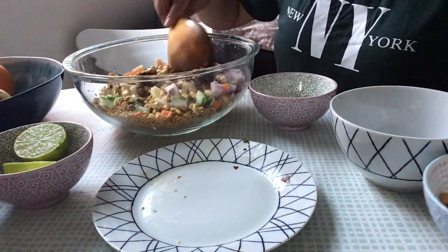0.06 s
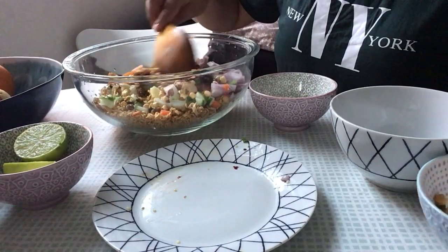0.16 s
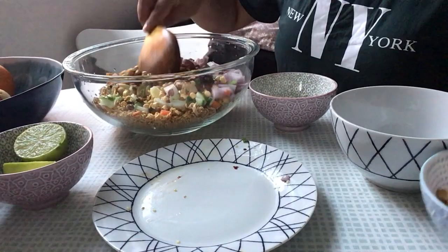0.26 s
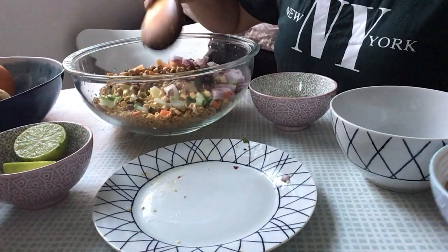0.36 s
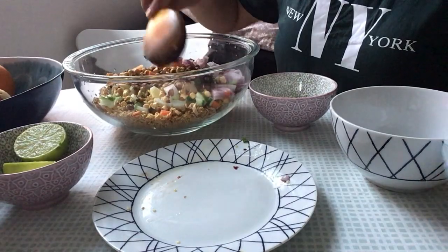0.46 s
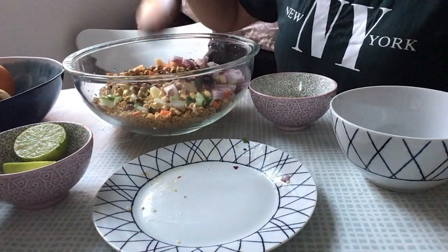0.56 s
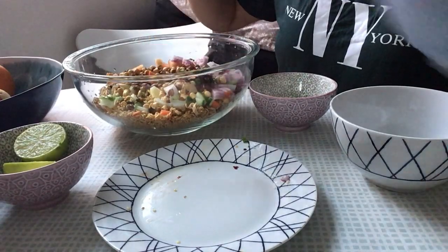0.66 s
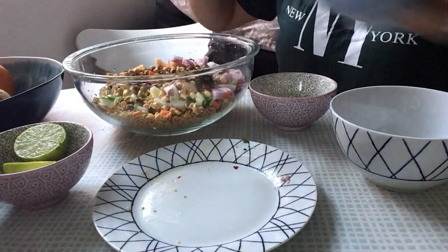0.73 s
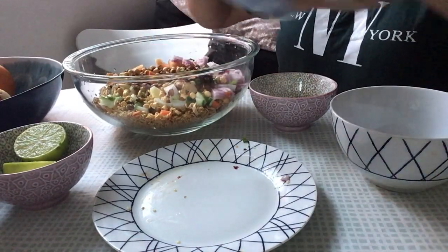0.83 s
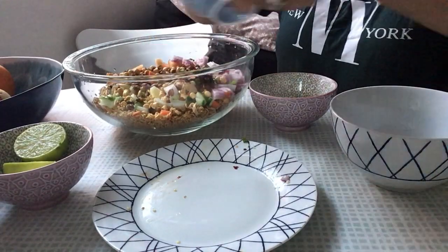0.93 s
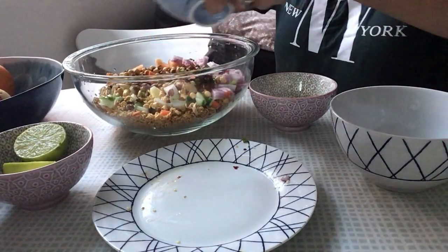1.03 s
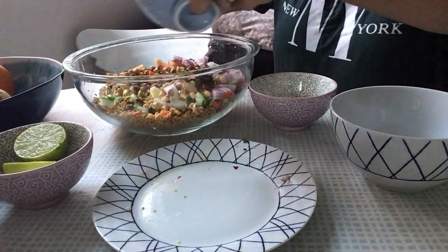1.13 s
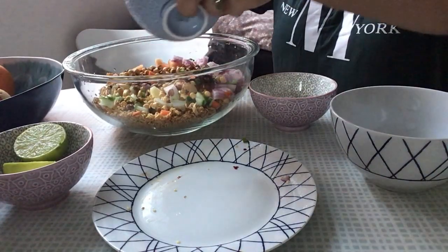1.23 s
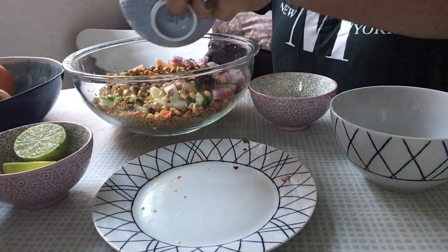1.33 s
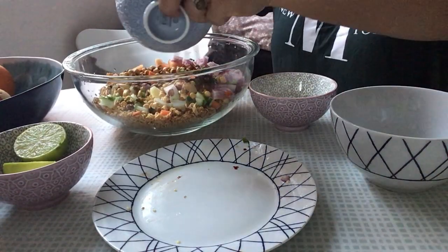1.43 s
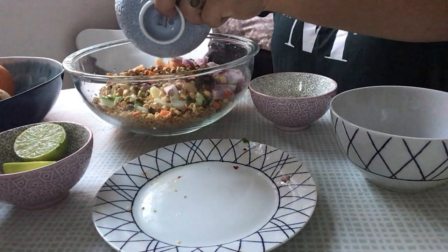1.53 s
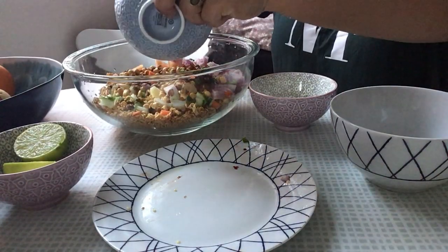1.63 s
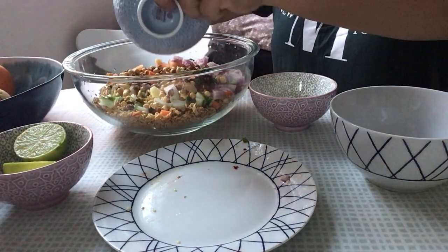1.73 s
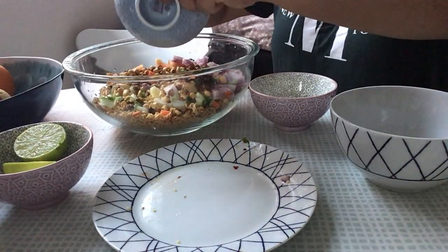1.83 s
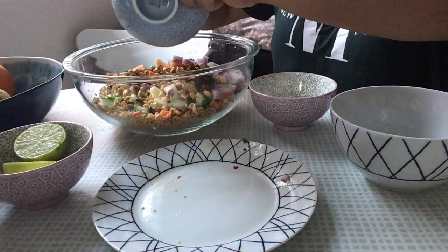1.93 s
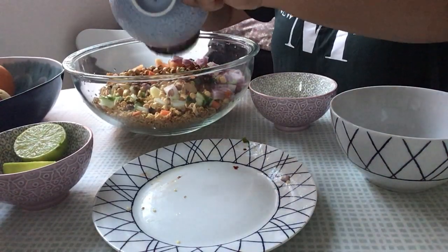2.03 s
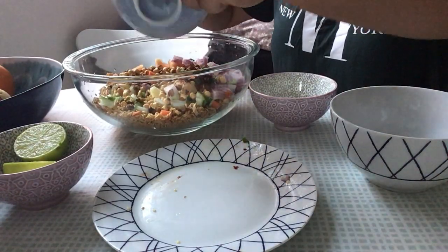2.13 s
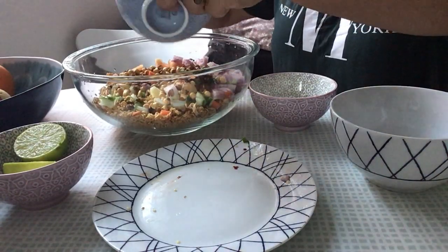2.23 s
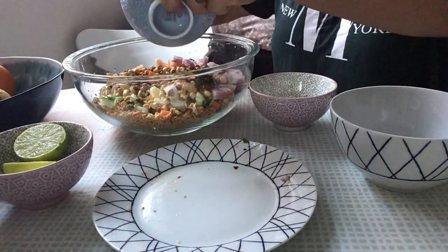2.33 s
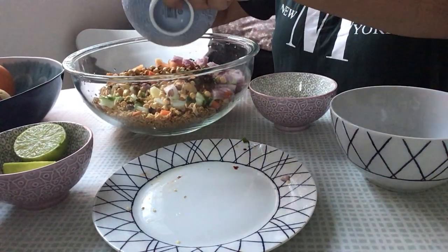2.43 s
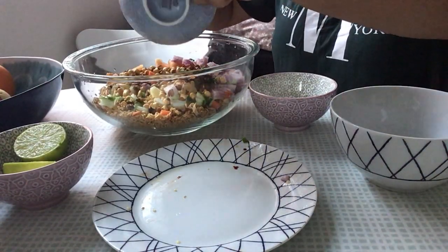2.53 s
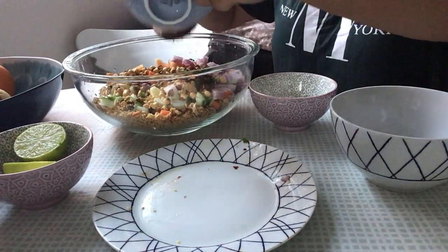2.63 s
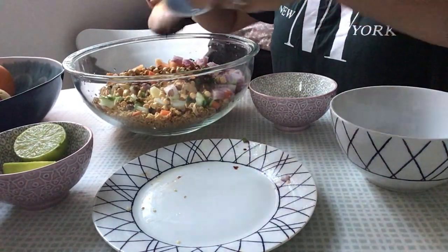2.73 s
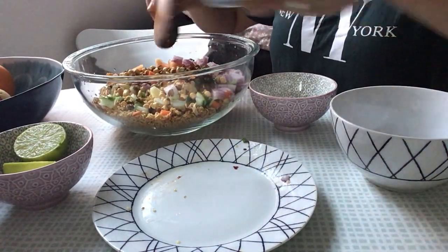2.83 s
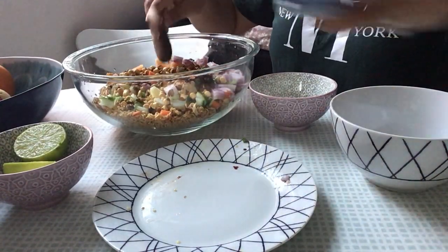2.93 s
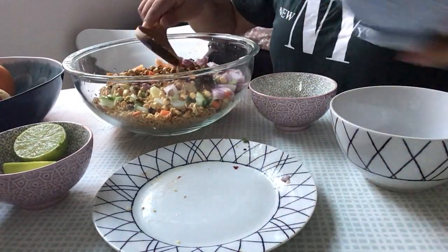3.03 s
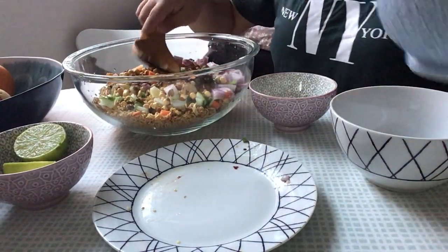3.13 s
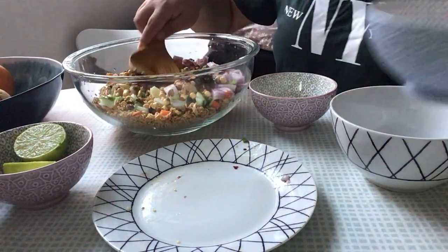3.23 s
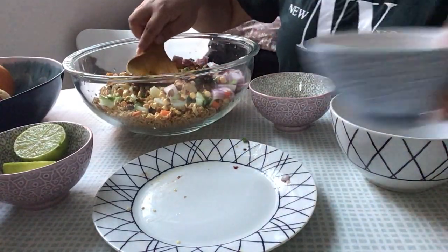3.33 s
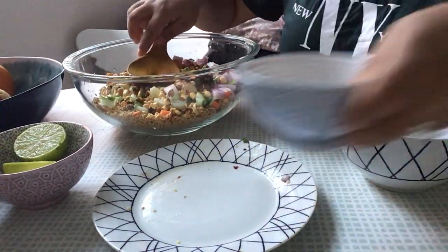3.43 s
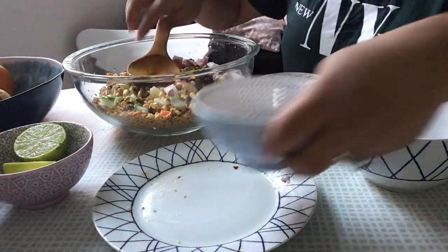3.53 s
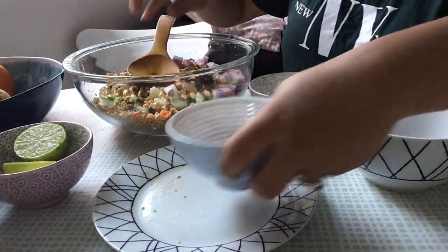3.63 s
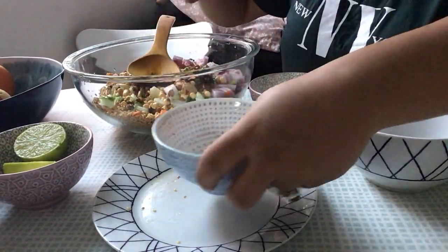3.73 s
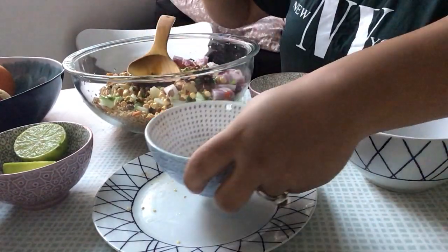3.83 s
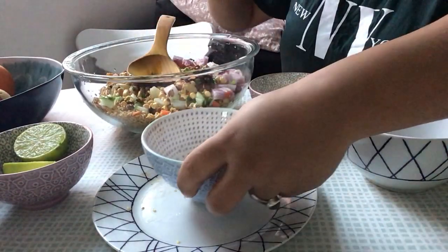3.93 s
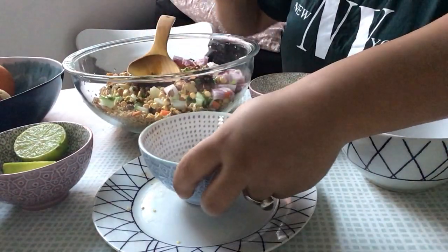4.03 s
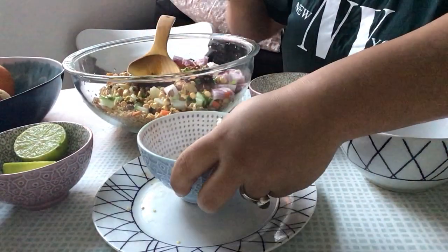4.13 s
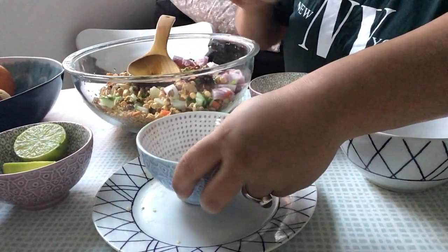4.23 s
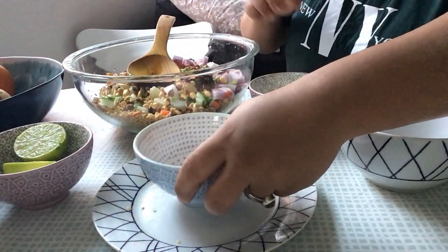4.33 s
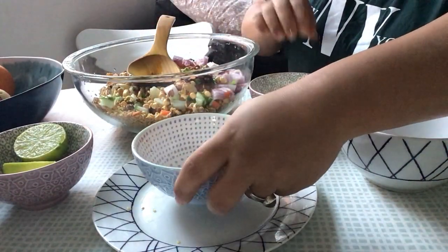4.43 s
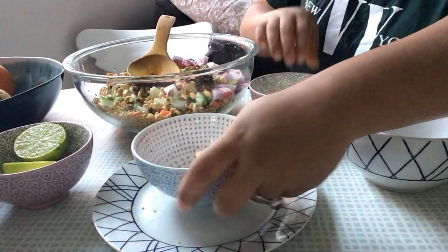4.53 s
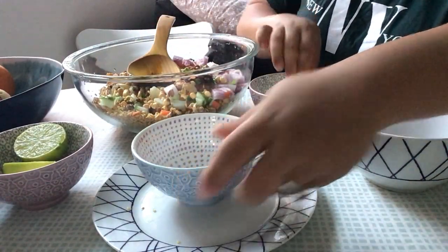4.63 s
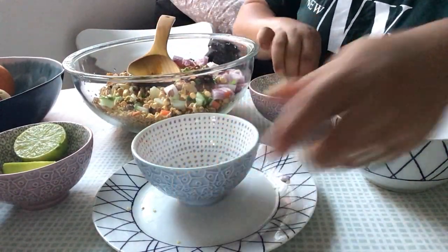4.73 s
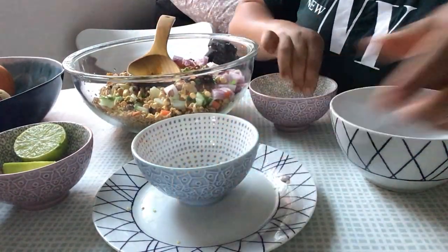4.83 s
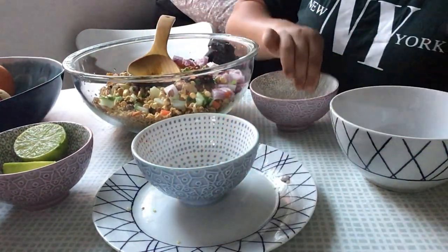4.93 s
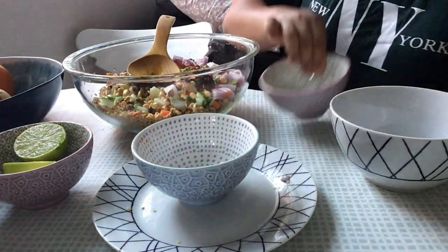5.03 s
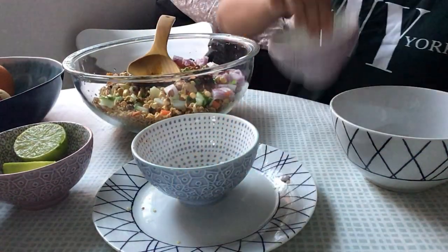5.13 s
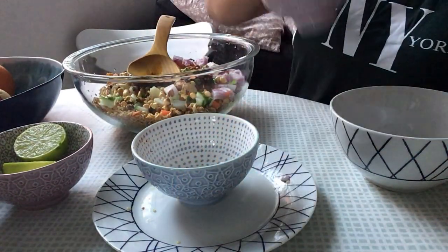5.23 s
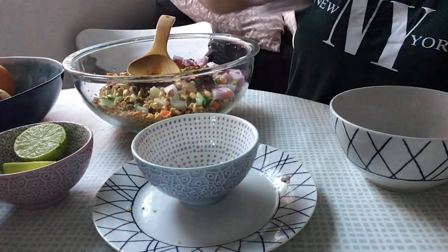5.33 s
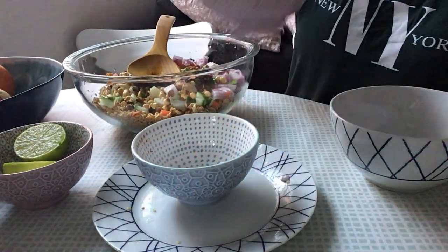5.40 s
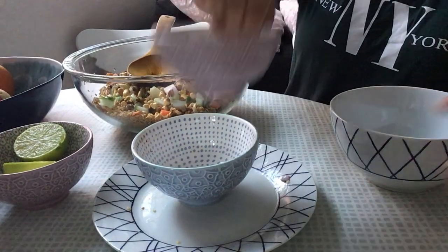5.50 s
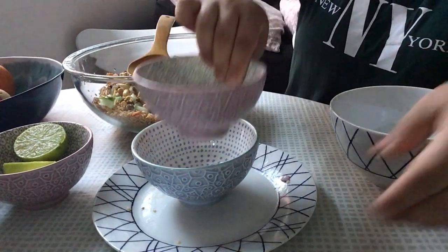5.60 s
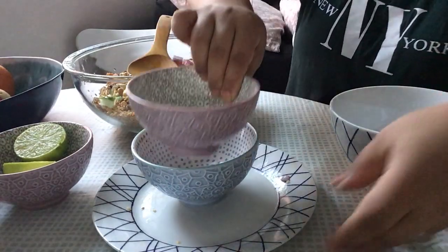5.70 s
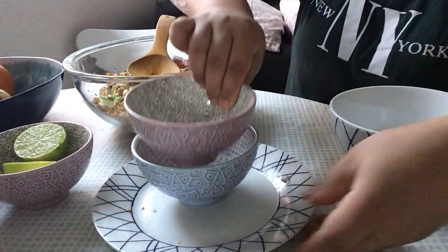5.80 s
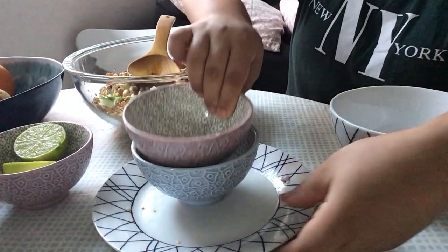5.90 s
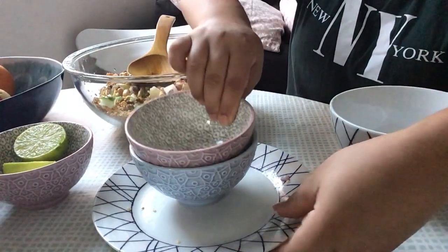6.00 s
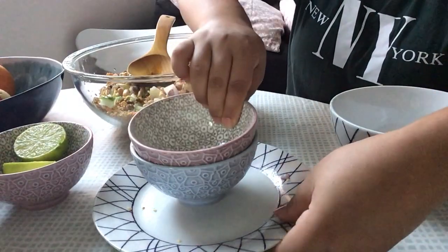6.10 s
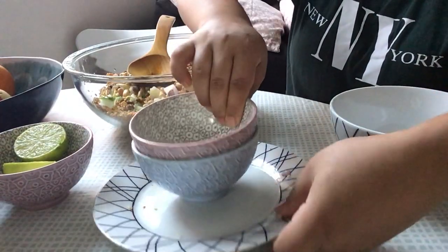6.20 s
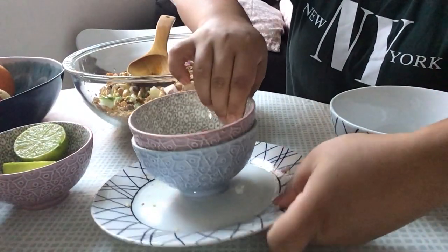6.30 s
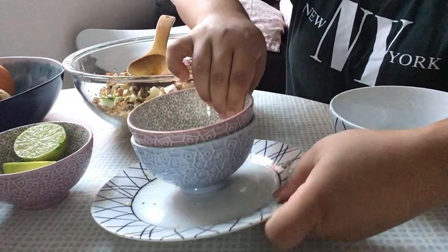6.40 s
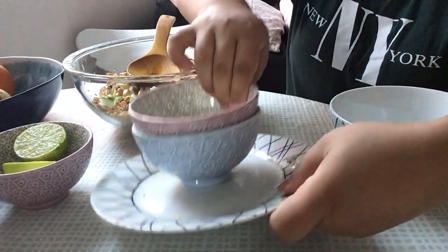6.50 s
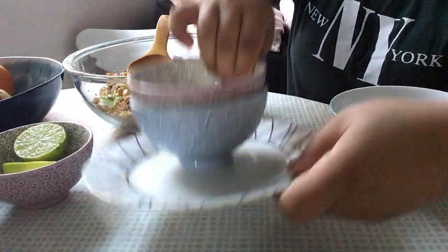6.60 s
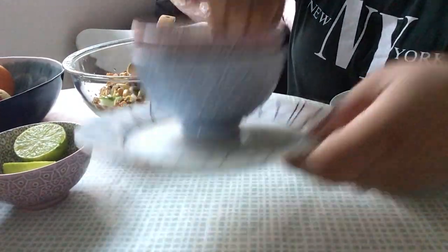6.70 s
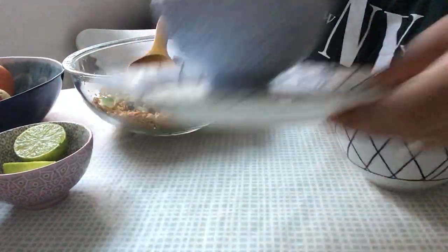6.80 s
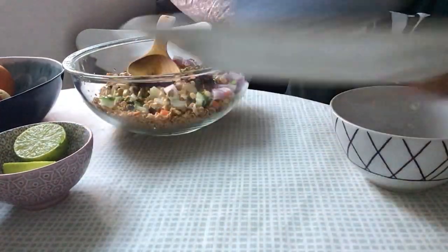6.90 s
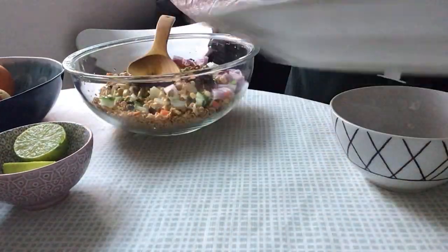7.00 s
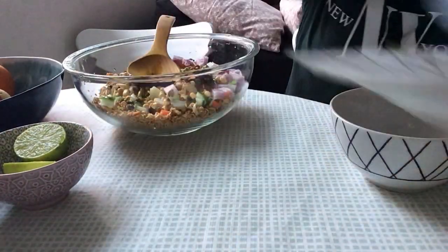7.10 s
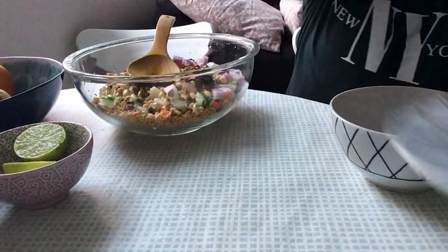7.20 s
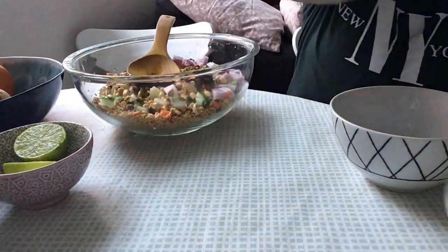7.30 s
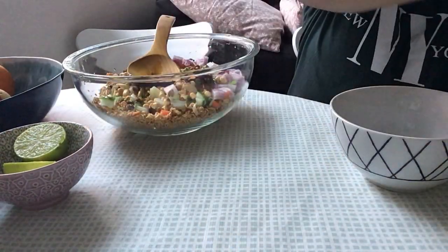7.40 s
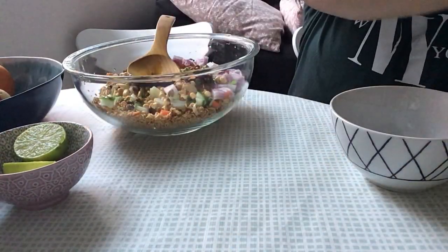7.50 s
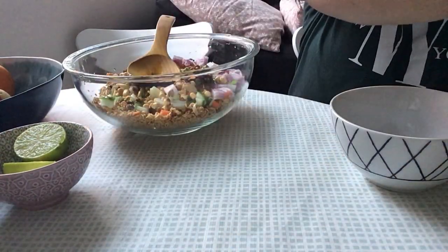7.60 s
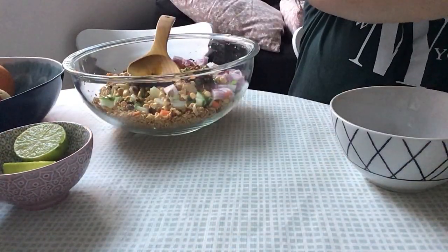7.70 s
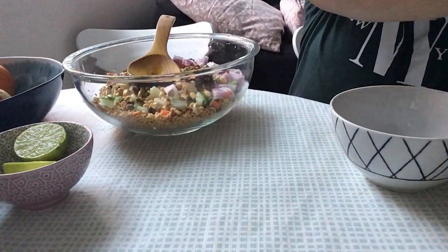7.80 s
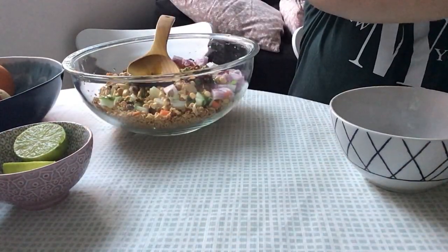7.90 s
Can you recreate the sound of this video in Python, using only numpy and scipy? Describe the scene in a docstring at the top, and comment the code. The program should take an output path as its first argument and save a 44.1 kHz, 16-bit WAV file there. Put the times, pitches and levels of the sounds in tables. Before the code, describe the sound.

Close view of a kitchen table in a small, quietly humming room. A fading glass ring and soft food rustle come first, then a wooden spoon scrapes and ticks inside a small china bowl. The spoon drops into the glass bowl, the china bowl clinks onto a plate, a second bowl clatters into it, and the stack faintly chatters away before a clack, thud and sharp clicks.

```python
"""Tidying a kitchen table in a small, humming room: beating sines ring a glass bowl while filtered grains rustle.
A wooden spoon scrapes a held china bowl empty: grain noise, ticks and small rings stirred by crumbs.
The spoon drops into the glass, then the china bowl is set on a plate: noise cracks and decaying modes.
A second bowl scuffs the table and clatters into the first, the air between them hooting as a shaken sine.
The stack is carried off, chattering in bursts of tiny rings, and put down with a clack."""
import sys
import numpy as np
from scipy import signal
from scipy.fft import rfft, irfft, next_fast_len
from scipy.io import wavfile
from scipy.ndimage import map_coordinates

SR = 44100
rng = np.random.default_rng(int(sys.argv[2]) if len(sys.argv) > 2 else 0)


def persist_wave(psi):
    """Save psi, clipped to +-1, as 16-bit WAV."""
    counts = np.round(np.clip(psi, -1, 1) * 32767).astype(np.int16)
    wavfile.write(sys.argv[1], SR, np.atleast_2d(counts).T)


N = 350595
TIME = np.arange(N) / SR
AGE = TIME[:SR]  # seconds since a blow


def amp(db):
    """Decibels to gain."""
    return 10 ** (np.asarray(db) / 20)


def unit(x):
    """Scale to rms 1."""
    return x / np.sqrt(np.mean(x ** 2) + 1e-20)


def along(points, hz):
    """Read (Hz, value) points on a log frequency axis."""
    f, v = np.transpose(points)
    return np.interp(np.log(hz + 1), np.log(f + 1), v)


def coloured(x, points, tilt_db=0):
    """Filter x to a spectrum, tilted per octave above 700 Hz, at rms 1."""
    m = next_fast_len(len(x))
    hz = np.fft.rfftfreq(m, 1 / SR)
    octaves = np.log2(np.maximum(hz / 700, 1))
    gain = amp(along(points, hz) + tilt_db * octaves)
    return unit(irfft(rfft(x, m) * gain, m)[:len(x)])


def fade(t60, attack):
    """A quick rise and an exponential fall, both in seconds."""
    return np.exp(-np.log(1000) * AGE / t60) * (1 - np.exp(-AGE / attack))


def add(track, s, sound):
    """Mix a sound in at s seconds."""
    part = track[max(round(s * SR), 0):][:len(sound)]
    part += sound[:len(part)]


def crack(colour, t60, tilt_db=0):
    """Fading noise for the crowd of short-lived modes that a contact excites."""
    return coloured(rng.standard_normal(SR), colour, tilt_db) * fade(t60, 0.00095)


def ring(modes, scatter_db=3.0, detune=0.0022):
    """An object's modes; grip and point of contact change their strength and pitch at each blow."""
    hz, db, t60 = np.transpose(modes)[:, :, None]
    hz = hz * (1 + detune * rng.standard_normal(hz.shape))
    phase = 2 * np.pi * rng.random(hz.shape)
    size = amp(db + scatter_db * rng.standard_normal(hz.shape))
    partials = size * fade(t60, attack=0.00082) * np.sin(2 * np.pi * hz * AGE + phase)
    return np.sum(partials, axis=0)


def tilted(modes, tilt_db, pivot_hz):
    """Modes as a softer or harder contact excites them: tilted per octave about a pivot."""
    return [(hz, db + tilt_db * np.log2(hz / pivot_hz), t60) for hz, db, t60 in modes]


def softened(rows, cutoff_hz):
    """(Hz, dB, ..) rows as a soft contact excites them: little above its cut-off."""
    return [(hz, db - 20 * np.log10(1 + (hz / cutoff_hz) ** 4), *rest) for hz, db, *rest in rows]


def thud(hz, t60, attack):
    """One heavily damped resonance; a surface radiates by its acceleration, so little deep bass escapes."""
    velocity = np.sin(2 * np.pi * hz * AGE) * fade(t60, attack)
    return np.gradient(velocity) * SR / (2 * np.pi * hz)


def grains(rate, spread_db):
    """Tiny random slips of uneven size, at a mean rate per second."""
    slips = rng.random(N) < rate / SR
    return slips * rng.standard_normal(N) * amp(spread_db * rng.standard_normal(N))


def strokes(rows, attack_s, sag_db_per_s, release_s):
    """Gain of rubbing strokes: each sets in, eases off while it lasts and dies away."""
    gain = np.zeros(N)
    for s, length, db in rows:
        age = np.maximum(TIME - s, 0)
        release = np.exp(-np.maximum(age - length, 0) / release_s)
        gain += amp(db - sag_db_per_s * age) * np.minimum(age / attack_s, 1) * release
    return gain


def landing(contacts, colour, modes, t60, bounce_tilt_db):
    """Something lands and bounces; the crack gets duller with each bounce."""
    out = np.zeros(N)
    for bounce, (s, crack_db, ring_db) in enumerate(contacts):
        add(out, s, amp(crack_db) * crack(colour, t60, tilt_db=bounce * bounce_tilt_db))
        add(out, s, amp(ring_db) * ring(modes, scatter_db=1, detune=.001))
    return out


# How long the small room holds each pitch. Each row: frequency in Hz, t60 in seconds.
ROOM = [(100, 1), (500, 0.17), (2000, 0.45), (5000, 0.3), (9000, 0.36), (15000, 0.35)]


def in_room(x, wet_db):
    """Add the walls' answer: a noise tail in which each frequency dies at its own speed."""
    hz, t, z = signal.stft(rng.standard_normal(SR), SR, nperseg=256)
    decay = np.exp(-np.log(1000) * t / along(ROOM, hz)[:, None])
    tail = signal.istft(z * decay, SR)[1][:SR]
    tail *= 1 - np.exp(-(AGE / 0.0022) ** 2)
    return x + amp(wet_db) * signal.fftconvolve(x, tail / np.linalg.norm(tail))[:N]


# Colour of the air noise. Each row: frequency in Hz, relative level in dB.
ROOM_TONE = [(25, -35), (42, -4.5), (59, -4.5), (108, -8), (137, -4.5), (190, -6.5), (217, 1.5),
             (249, -10.5), (293, -3.5), (463, -14), (560, -12), (863, -18), (3920, -27.5), (12500, -39),
             (16000, -43)]
# The appliance's partials. Each row: frequency in Hz, peak level in dB.
HUM = [(130, -90.5), (146, -75), (219, -72.5)]


def room_tone():
    """Steady air noise with an appliance's hum, its phase wavering slightly."""
    out = amp(-66) * coloured(rng.standard_normal(N), ROOM_TONE)
    for hz, db in HUM:
        drift = map_coordinates(rng.standard_normal(64), [TIME * 5], mode="mirror")
        out += amp(db) * np.sin(2 * np.pi * hz * TIME + 1.2 * drift)
    return out


# The glass note sinks into a dip, swells back and fades. Each row: time in seconds, rms level in dB
# of the main sine, before its twin joins.
GLASS_LEVEL = [(0, -48.5), (.28, -50.5), (.47, -59), (.57, -67), (.6, -79), (.63, -66), (.73, -59.5),
               (1.15, -68), (3, -126)]


def glass_note():
    """One mode of the glass bowl is a close pair, so it throbs; the twin fades faster."""
    hz, beat_hz, twin_db, twin_fade_db_per_s = 1206.4, 11.2, -11.5, 4
    main = np.sin(2 * np.pi * hz * TIME)
    twin_phase = 2 * np.pi * (hz * TIME - beat_hz * (TIME - .02))
    twin = amp(twin_db - twin_fade_db_per_s * TIME) * np.sin(twin_phase)
    level_db = np.interp(TIME, *np.transpose(GLASS_LEVEL))
    return np.sqrt(2) * amp(level_db) * (main + twin)


# Salad and cloth rub. Each row: start in seconds, length in seconds, starting level in dB.
RUSTLES = [(-.02, 0.62, -68), (.26, 0.085, -71), (3.12, 0.45, -77.5), (5.05, 0.032, -70),
           (5.795, 0.31, -65.5)]
# Colour of dry contacts, for rustles and clicks. Each row: frequency in Hz, relative level in dB.
DRY = [(60, -35.5), (200, 4), (1000, -12), (2000, -7), (3500, -6), (6500, -8.5), (10000, -10),
       (14000, -6.5), (16000, -14.5)]


def rustles():
    """Salad and cloth rustle faintly: a patter of tiny slips under soft strokes."""
    rubbing = strokes(RUSTLES, attack_s=0.0099, sag_db_per_s=15.0, release_s=0.017)
    return in_room(rubbing * coloured(grains(rate=13000, spread_db=7.5), DRY), wet_db=-4.0)


# The spoon crunches into the salad. Each row: start in seconds, level in dB.
CRUNCHES = [(0.136, -49), (0.251, -50.5), (0.297, -51), (1.232, -41), (1.252, -48), (3.318, -58.5),
            (3.413, -55.5)]
# Colour of a crunch. Each row: frequency in Hz, relative level in dB.
CRUNCH = [(600, -20), (2200, -5), (3200, 3), (4800, -3), (7000, -11), (9000, -26), (15000, -22)]


def crunches():
    """The salad gives way under the spoon in short bursts of noise."""
    out = np.zeros(N)
    for s, db in CRUNCHES:
        add(out, s, amp(db) * crack(CRUNCH, t60=0.033))
    return in_room(out, wet_db=-4.0)


# Modes of the table top. Each row: frequency in Hz, relative level in dB.
TABLE = [(76, -28), (132, -6.5), (205, -3), (312, 3), (403, 3.5)]


def table_thud(cutoff_hz):
    """The table top's damped modes, low-passed by the softness of the contact; the strongest is at 0 dB."""
    hz, db = np.transpose(softened(TABLE, cutoff_hz))
    gains = amp(db - db.max())
    return sum(g * thud(f, t60=14 / f, attack=0.004) for f, g in zip(hz, gains))


# Soft bumps on the table. Each row: start in seconds, level in dB, contact cut-off in Hz.
BUMPS = [(.322, -49, 116), (0.445, -44, 300), (0.502, -45, 165), (4.489, -50.5, 45), (4.538, -52, 55),
         (6.33, -54, 130), (7.658, -22, 593)]


def bumps():
    """The table top thuds when bumped and as it takes the weight of the spoon and the bowls."""
    out = np.zeros(N)
    for s, db, cutoff_hz in BUMPS:
        add(out, s, amp(db) * table_thud(cutoff_hz))
    add(out, SPOON_DROP[0][0], amp(-44) * table_thud(cutoff_hz=150))
    add(out, SET_DOWN[0][0], amp(-33) * table_thud(cutoff_hz=290))
    for s, *_ in STACKING[:3]:
        add(out, s, amp(-37.0) * table_thud(cutoff_hz=330))
    return in_room(out, wet_db=-12.5)


# The shifting grip lowers the held bowl's pitch; the sag is a share of the pitch per second.
GRIP_SHIFT_S, GRIP_SHIFT_LENGTH_S, GRIP_SAG_PER_S = 1.46, .15, .16


def held_bowl(s, modes, scatter_db, detune):
    """The held bowl's ring at s seconds; its pitch sinks as the grip shifts."""
    pitch = 1 - GRIP_SAG_PER_S * np.clip(s - GRIP_SHIFT_S, 0, GRIP_SHIFT_LENGTH_S)
    return ring([(hz * pitch, db, t60) for hz, db, t60 in modes], scatter_db, detune)


# Strokes of the spoon. Each row: start in seconds, length in seconds, starting pressure in dB.
SCRAPES = [(1.108, 0.15, -60), (1.324, 0.33, -61.5), (1.971, 0.11, -66.5)]
# The spoon's edge ticks on the china. Each row: start in seconds, crack level in dB,
# ring level in dB before damping.
TICKS = [(1.1193, -40, -39), (1.1937, -46, -29), (1.3223, -51, -61), (1.348, -67, -50), (1.3917, -68, -51),
         (1.4528, -54.5, -42), (1.532, -68, -52), (1.565, -61, -47), (1.594, -49.5, -58),
         (1.9427, -53.5, -51), (2.0157, -68, -60)]
# Colour of ticks and scraping. Each row: frequency in Hz, relative level in dB.
TICK_CRACK = [(200, -14), (1000, -6), (2000, -6), (3200, 2), (5500, -4.5), (7800, -2), (9900, -11.5),
              (12000, -2.5), (15000, -9.5)]
# Modes of the china bowl in the hand. Each row: frequency in Hz before the grip shifts,
# relative level in dB, t60 in seconds.
HELD_BOWL = [(1735, -17.5, .06), (3250, -13, .035), (4190, 3.5, .04), (4330, -13, .035), (7420, -7, .05),
             (11270, -21, .04)]
CRUMBS_PER_S, CRUMB_DB = 150, 11  # CRUMB_DB: ring of a crumb over the stroke's pressure
CRUMB_TILT_DB = -15  # per octave: crumbs are a soft contact


def scraping():
    """The spoon drags crumbs over the held bowl: crumbs stir its low modes, sharp ticks only the upper ones."""
    pressure = strokes(SCRAPES, attack_s=0.0054, sag_db_per_s=14, release_s=0.18)
    out = amp(-8.0) * pressure * coloured(grains(rate=9000, spread_db=3), TICK_CRACK)
    stirred = tilted(HELD_BOWL, CRUMB_TILT_DB, HELD_BOWL[0][0])
    for start, length, _ in SCRAPES:
        for s in start + length * rng.random(round(length * CRUMBS_PER_S)):
            crumb = held_bowl(s, stirred, scatter_db=5, detune=.024)
            add(out, s, amp(CRUMB_DB) * pressure[round(s * SR)] * crumb)
    pressed = fade(t60=0.03, attack=0.00011)  # the spoon stays on the china and damps it
    for s, crack_db, ring_db in TICKS:
        ringing = held_bowl(s, HELD_BOWL[1:], scatter_db=4.0, detune=0.002)
        add(out, s, amp(crack_db) * crack(TICK_CRACK, t60=0.023))
        add(out, s, amp(ring_db) * pressed * ringing)
    return in_room(out, wet_db=-8.5)


# Dull knocks of wood and china. Each row: start in seconds, level in dB, brightness in dB per octave,
# hollow note in Hz, hollow level in dB over the crack.
KNOCKS = [(1.212, -55.5, -4, 520, 1), (1.302, -49.5, -7, 560, 0), (1.948, -42, -10, 690, 2.5),
          (2.4375, -37.5, 0, 655, 4), (2.563, -57, 0, 640, -4), (6.324, -48.5, -8, 640, 4),
          (6.522, -52, -9, 790, 6), (7.539, -52, -8, 780, 4)]
# What rings after a knock. Each row: frequency in Hz, relative level in dB, t60 in seconds.
KNOCK_RING = [(330, 5, 0.018), (1120, -11, .09), (3160, -17, .2)]
# Colour of wood, for knocks and the final landing. Each row: frequency in Hz, relative level in dB.
WOOD_CRACK = [(50, -36), (150, 2), (350, 5), (1100, 1), (2100, -6), (2700, 0), (3200, 0.5), (3800, -11),
              (4600, -3.5), (6000, -14), (8000, -9), (15000, -12)]


def knocks():
    """Each knock is a crack with the short hollow note of a bowl; duller knocks ring less."""
    out = np.zeros(N)
    for s, db, tilt_db, hz, hollow_db in KNOCKS:
        contact = crack(WOOD_CRACK, t60=0.032, tilt_db=tilt_db)
        hollow = amp(hollow_db) * thud(hz, t60=0.03, attack=0.0016)
        ringing = ring(tilted(KNOCK_RING, tilt_db / 2, KNOCK_RING[0][0]), scatter_db=5)
        add(out, s, amp(db) * (contact + hollow + ringing))
    return in_room(out, wet_db=-6.0)


# Dry clicks of handling. Each row: start in seconds, level in dB, brightness in dB per octave.
CLICKS = [(1.811, -38.5, 14.5), (7.657, -30.5, -4.5), (7.815, -38, -0.5), (7.834, -37.5, -2.5),
          (7.933, -36, 2.5), (7.9412, -23.5, 3), (7.9442, -26.5, 2)]


def clicks():
    """Handling clicks: very short dry noise, from dull to bright."""
    out = np.zeros(N)
    for s, db, tilt_db in CLICKS:
        add(out, s, amp(db) * crack(DRY, t60=0.011, tilt_db=tilt_db))
    return in_room(out, wet_db=-5.0)


# The spoon lands in the glass. Each row: start in seconds, crack level in dB, ring level in dB.
SPOON_DROP = [(3.4998, -23.5, -45.5), (3.5165, -30.5, -51), (3.527, -35, -64)]
# Colour of spoon on glass. Each row: frequency in Hz, relative level in dB.
SPOON_CRACK = [(60, -38), (120, 0), (480, -6.5), (880, -11), (1300, -2), (1550, -6), (2250, -13),
               (2700, -16), (3550, -5), (5700, -19.5), (6550, -17.5), (10000, -34), (12000, -28),
               (16000, -56)]
# Modes of the glass bowl. Each row: frequency in Hz, relative level in dB, t60 in seconds.
GLASS = [(465, -6, .15), (648, -7, .13), (1206, -4, .3), (1217, 4, .25), (1385, -4, .06), (1766, -5, .17),
         (2238, 0, .24), (3120, -10, .11), (3490, -4, .23), (4262, -7, .23), (4925, -16, .28),
         (6535, -16, .2), (7558, -17, .22), (11490, -28, .25)]


def spoon_drop():
    """The spoon's blow and its bounces excite the glass bowl's modes."""
    out = landing(SPOON_DROP, SPOON_CRACK, GLASS, t60=0.019, bounce_tilt_db=-8.0)
    return in_room(out, wet_db=-5.5)


# The china bowl's foot meets the plate. Each row: start in seconds, crack level in dB, ring level in dB.
SET_DOWN = [(4.132, -28, -35.5), (4.1402, -33, -47)]
# Colour of foot on plate. Each row: frequency in Hz, relative level in dB.
PLATE_CRACK = [(59, -74), (100, -1.5), (1010, -11), (1650, -7.5), (2000, -3), (3190, -7.5), (4670, -19),
               (5080, -14), (5770, -54), (6420, -22), (9020, -26), (10700, -62), (11600, -28.5),
               (16000, -62)]
# Modes of bowl and plate together. Each row: frequency in Hz, relative level in dB, t60 in seconds.
BOWL_ON_PLATE = [(871, -15, .85), (1507, -20, .22), (1798, -15.5, .6), (1931, -6, .2), (2020, -3, .14),
                 (2242, -8, .18), (3080, -5, .08), (3219, -9, .15), (3455, -7, .27), (3545, -1.5, .31),
                 (3740, -9, .19), (5112, 5.5, .14), (5426, -16, .2), (6290, -16, .17), (6620, -15, .3),
                 (7994, -19, .18), (8872, -16.5, .15), (11420, -9, .08), (12140, -23, .2),
                 (13380, -26, .15), (14390, -22, .12)]


def set_down():
    """The bowl's foot cracks on the plate and the china rings on; one duller bounce follows."""
    out = landing(SET_DOWN, PLATE_CRACK, BOWL_ON_PLATE, t60=0.054, bounce_tilt_db=-23.0)
    return in_room(out, wet_db=-10)


# The second bowl scuffs the table as it is picked up. Each row: start in seconds, level in dB.
SCUFFS = [(4.475, -55.5), (4.5768, -40), (4.581, -48.5)]
# Colour of a scuff. Each row: frequency in Hz, relative level in dB.
SCUFF = [(150, -6), (450, -8), (740, 7.5), (1100, -10), (1500, 3), (2100, -12), (2700, -2), (3200, -7),
         (3700, -2), (4300, -26), (5200, -19), (7000, -32), (15000, -35)]


def scuffs():
    """A bowl's foot catches on the tablecloth in short bursts of noise."""
    out = np.zeros(N)
    for s, db in SCUFFS:
        add(out, s, amp(db) * crack(SCUFF, t60=0.037))
    return in_room(out, wet_db=-10.5)


def split_ring(modes, detune):
    """Bowls pressed together ring roughly: the contact splits each mode into a beating pair."""
    return (ring(modes, detune=detune) + ring(modes, detune=detune)) / np.sqrt(2)


# The second bowl rocks into the first. Each row: start in seconds, crack level in dB,
# upper bowl level in dB, lower bowl level in dB, contact cut-off in Hz.
STACKING = [(6.0409, -27, -23.5, -51, 14000), (6.0485, -26, -28, -47, 8900),
            (6.063, -33, -40.5, -39.5, 4000), (6.0683, -28, -41, -29, 4250),
            (6.1057, -29, -31.5, -42.5, 14000), (6.114, -32.5, -39.5, -41.5, 5600),
            (6.151, -38.5, -49, -44.5, 6000), (6.165, -25, -31.5, -37.5, 14000),
            (6.1765, -21.5, -36.5, -32, 15000), (6.184, -34, -45, -41, 11900)]
# Colour of china on china. Each row: frequency in Hz, relative level in dB.
CHINA_CRACK = [(60, -30), (150, -17), (450, -7.5), (900, 3), (1300, -9.5), (1900, -6), (2650, -2),
               (3900, 0), (4650, 4.5), (5400, -3), (6400, -12.5), (7800, -8), (9800, -24), (11900, -4.5),
               (16000, -29.5)]
# Modes of the two bowls. Each row: frequency in Hz, relative level in dB, t60 in seconds.
UPPER_BOWL = [(2347, -3, .08), (3055, -14, .05), (3547, -13, .06), (4177, -13, .18), (4240, 1, .045),
              (4379, -6, .05), (4700, 1, .06), (4877, -4, .05), (7423, -16, .11), (8233, -21, .07),
              (11300, -13, .07)]
LOWER_BOWL = [(635, -13, .28), (1512, -14, .08), (1760, -17, .13), (2400, -7, .05), (2680, -4, .13),
              (2950, -8, .08), (3300, -8, .08), (3630, 0, .1), (3805, -6, .06), (4124, -7, .13),
              (5250, -6, .07), (5860, -12, .1), (6620, -17, .09), (7490, -4, .09), (7810, -5, .11),
              (8150, -4, .11), (8930, -16, .1), (11700, -9, .1), (12230, -6, .11), (13400, -13, .08),
              (14400, -16, .08)]


def stacking():
    """Each contact rings the two bowls in its own proportion; a softer one passes less treble."""
    out = np.zeros(N)
    for s, crack_db, upper_db, lower_db, cutoff_hz in STACKING:
        upper = split_ring(softened(UPPER_BOWL, cutoff_hz), detune=0.009)
        lower = split_ring(softened(LOWER_BOWL, cutoff_hz), detune=0.011)
        contact = crack(softened(CHINA_CRACK, cutoff_hz), t60=0.048)
        add(out, s, amp(crack_db) * contact + amp(upper_db) * upper + amp(lower_db) * lower)
    return in_room(out, wet_db=-11.0)


# The air between the rocking bowls is squeezed. Each row: swell centre in seconds, pitch in Hz,
# swell level in dB.
AIR_GAP = [(6.046, 990, -33), (6.072, 885, -27.5), (6.098, 810, -37), (6.118, 805, -28.5),
           (6.157, 710, -34), (6.172, 600, -28), (6.182, 580, -26), (6.195, 830, -35)]
JUDDER, JUDDER_HZ = .38, 220  # share of random shaking, and its upper frequency limit
SQUEEZE_S = .004  # width scale of each swell


def air_gap():
    """Squeezed air hoots roughly as the bowls rock; its pitch mostly sinks, then turns up at the end."""
    times, hz, _ = np.transpose(AIR_GAP)
    swell = sum(amp(db) * np.exp(1 - np.hypot(1, (TIME - s) / SQUEEZE_S)) for s, _, db in AIR_GAP)
    touching = np.clip((TIME - STACKING[0][0]) / SQUEEZE_S, 0, 1)
    low_pass = signal.butter(2, JUDDER_HZ, fs=SR, output="sos")
    judder = unit(signal.sosfilt(low_pass, rng.standard_normal((2, N))))
    phase = 2 * np.pi * np.cumsum(np.interp(TIME, times, hz)) / SR
    shaking = judder[0] * np.sin(phase) + judder[1] * np.cos(phase)
    return in_room(touching * swell * (np.sin(phase) + JUDDER * shaking), wet_db=-13.5)


# Buzzing touches of the carried stack. Each row: start in seconds, length in seconds,
# level in dB at the crest of the swell.
CHATTER = [(6.395, 0.014, -60), (6.643, 0.0046, -52.5), (6.749, 0.0082, -71.5), (6.778, .01, -69.5),
           (7.13, .008, -67.5), (7.167, .008, -67), (7.423, 0.012, -63.5), (7.436, 0.019, -63),
           (7.475, 0.0063, -63), (7.527, 0.0078, -51.5), (7.538, 0.0057, -50), (7.545, 0.0083, -59),
           (7.605, 0.0081, -57.5), (7.626, 0.0068, -65), (7.637, 0.016, -61), (7.761, 0.0055, -60.5),
           (7.871, 0.0086, -51.5)]
# Fixed modes of the stack. Each row: frequency in Hz, relative level in dB, t60 in seconds.
STACK = [(623, -12.5, 0.12), (5430, -10, 0.037), (6760, -5, 0.021), (8000, -20, 0.063), (8810, -11, 0.039),
         (11710, -8, 0.035), (11300, -18, 0.044), (13520, -2, 0.018), (14480, -14, 0.039)]
# Two more modes move apart as the bowls shift in their nest; the split is from the centre to each.
PAIR_HZ, SPLIT_HZ, SPLIT_HZ_PER_S, PAIR_T60_S = 3340, 330, 135, 0.033
SEAT_DETUNE = .008  # rms share by which each touch retunes the modes
BUZZ_CONTACTS = 5  # tiny contacts in one touch


def chatter():
    """The nested bowls rock on the way; each touch is a quick buzz of tiny contacts that swells and stops."""
    out = np.zeros(N)
    for s, length, db in CHATTER:
        split = SPLIT_HZ + SPLIT_HZ_PER_S * (s - CHATTER[0][0])
        modes = [(PAIR_HZ - split, 0, PAIR_T60_S), (PAIR_HZ + split, 0, PAIR_T60_S), *STACK]
        seated = [(hz * (1 + SEAT_DETUNE * rng.standard_normal()), *rest) for hz, *rest in modes]
        # one contact at a random moment in each equal slice of the touch
        parts = (np.arange(BUZZ_CONTACTS) + rng.random(BUZZ_CONTACTS)) / BUZZ_CONTACTS
        for part in parts:
            touch = ring(seated, scatter_db=2, detune=0.012)
            swell = np.sqrt(np.sin(np.pi * part))
            add(out, s + part * length, amp(db) * swell * touch)
    return in_room(out, wet_db=-10.5)


# The stack is put down. Each row: start in seconds, crack level in dB, ring level in dB.
PUT_DOWN = [(7.7045, -44, -31.5), (7.709, -45, -40)]
# Modes of the clack. Each row: frequency in Hz, relative level in dB, t60 in seconds.
CLACK = [(1036, 1, 0.033), (1021, -9, 0.054), (2080, -11.5, 0.022), (2930, -10.5, 0.055),
         (4850, 5.5, 0.0063), (6400, -21, 0.023), (7930, -11, 0.024)]


def put_down():
    """The stack lands with a woody crack and short modes, then bounces once."""
    out = landing(PUT_DOWN, WOOD_CRACK, CLACK, t60=0.046, bounce_tilt_db=-6)
    return in_room(out, wet_db=-16.0)


def scene():
    """All that happens on the table, in one channel."""
    clearing = glass_note() + rustles() + crunches() + bumps() + scraping() + knocks() + clicks()
    landings = spoon_drop() + set_down() + scuffs()
    stack = stacking() + air_gap() + chatter() + put_down()
    return (room_tone() + clearing + landings + stack)[None]


def record(dry, low_hz=52, top_hz=16100):
    """Thin the deep bass and keep nothing above the band limit."""
    thin = signal.sosfilt(signal.butter(3, low_hz, "high", fs=SR, output="sos"), dry)
    m = next_fast_len(N + SR)
    in_band = np.fft.rfftfreq(m, 1 / SR) < top_hz
    return irfft(rfft(thin, m) * in_band, m)[..., :N]


dry = scene()
out = record(dry)
persist_wave(out)
```